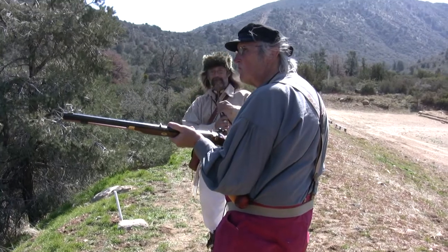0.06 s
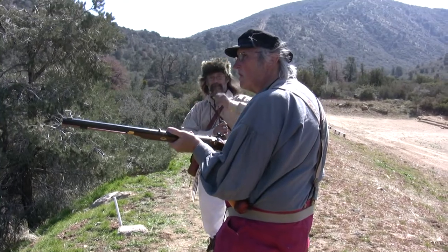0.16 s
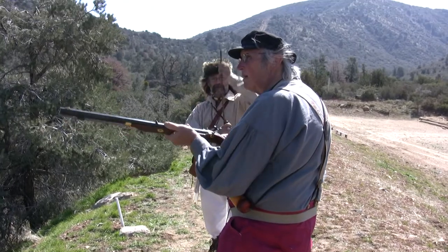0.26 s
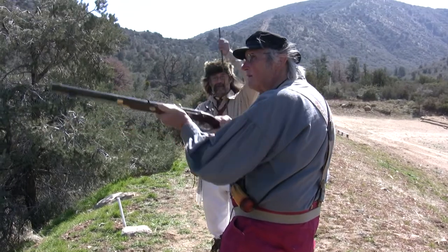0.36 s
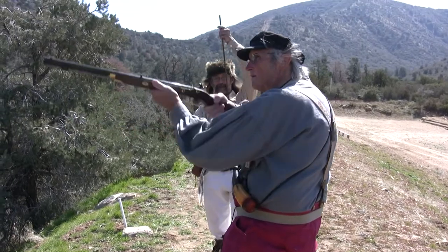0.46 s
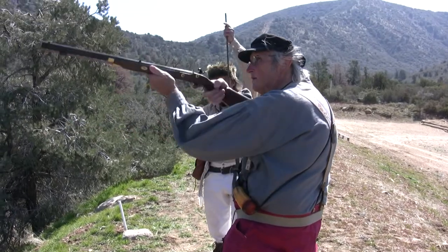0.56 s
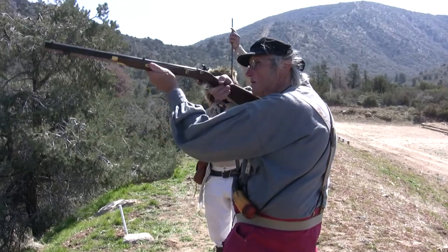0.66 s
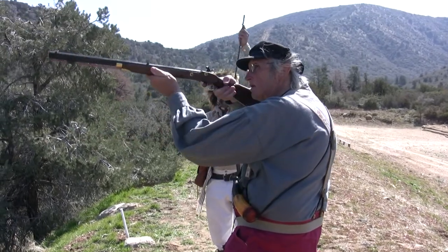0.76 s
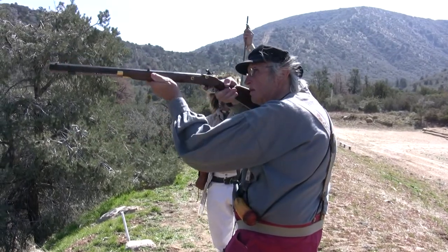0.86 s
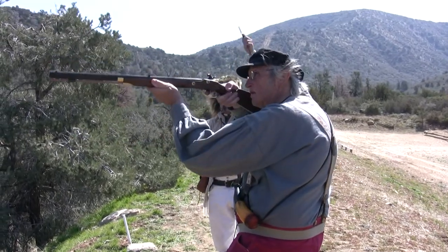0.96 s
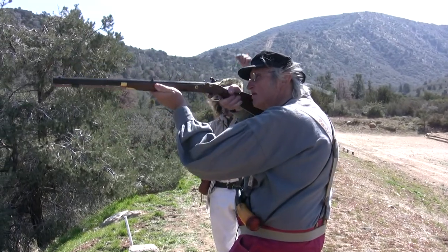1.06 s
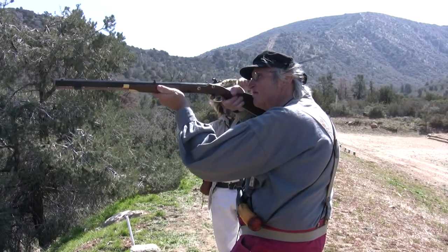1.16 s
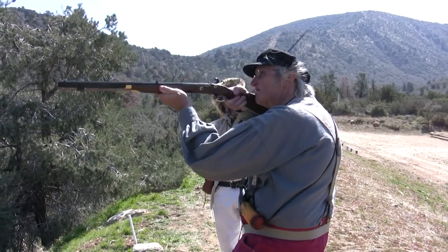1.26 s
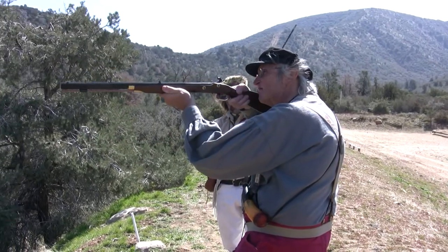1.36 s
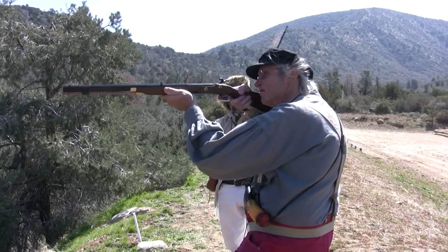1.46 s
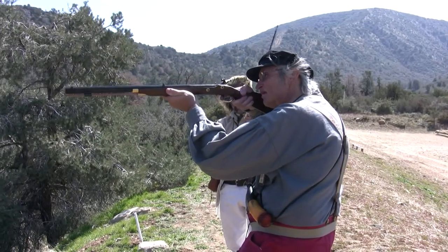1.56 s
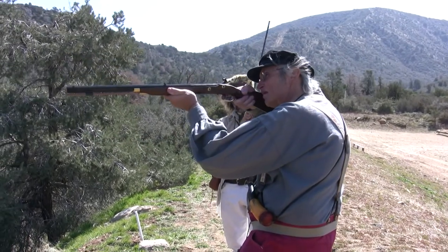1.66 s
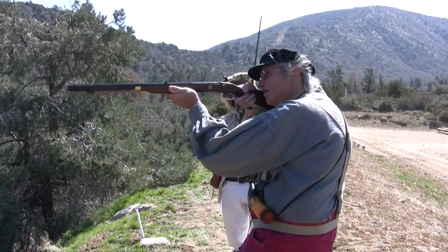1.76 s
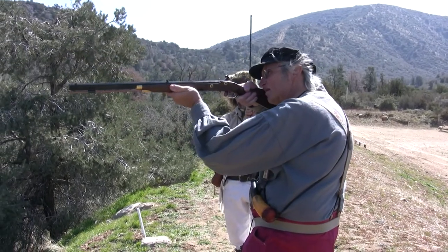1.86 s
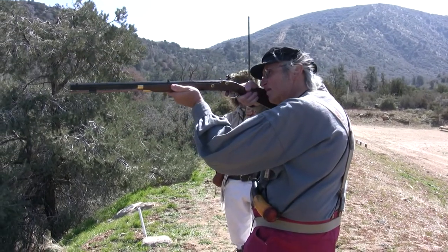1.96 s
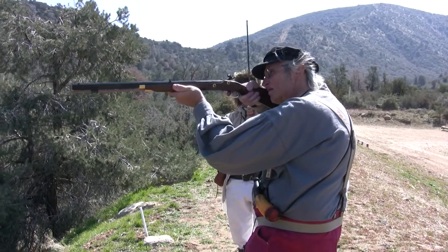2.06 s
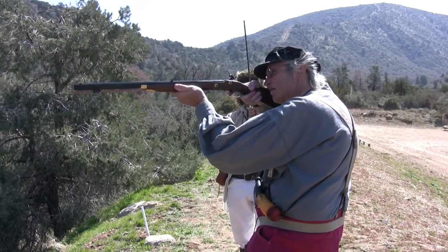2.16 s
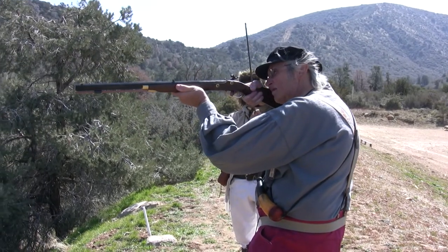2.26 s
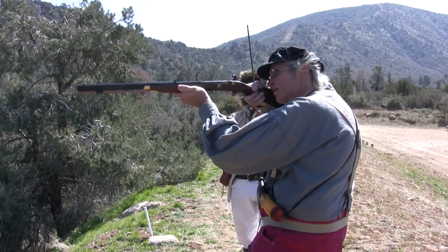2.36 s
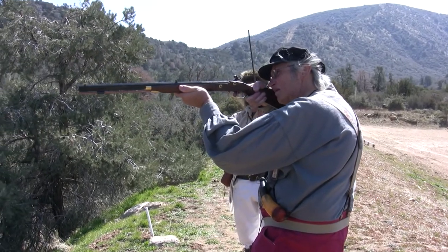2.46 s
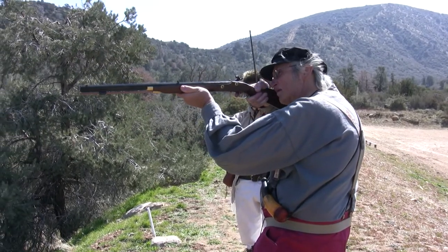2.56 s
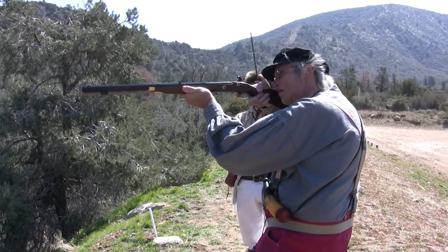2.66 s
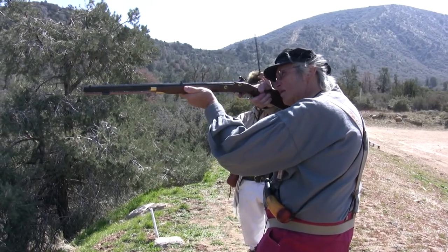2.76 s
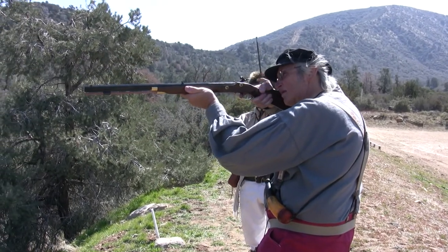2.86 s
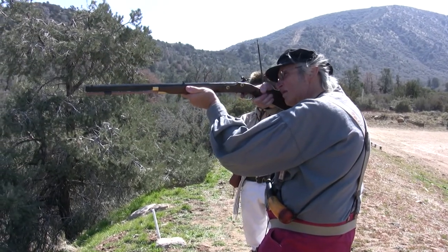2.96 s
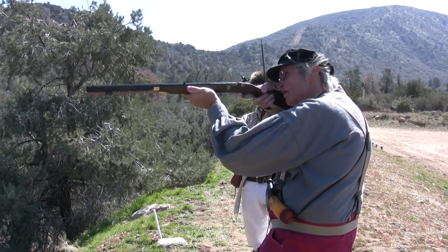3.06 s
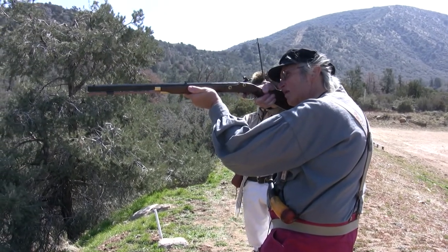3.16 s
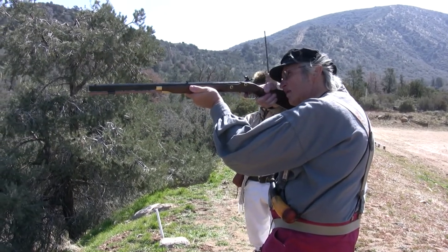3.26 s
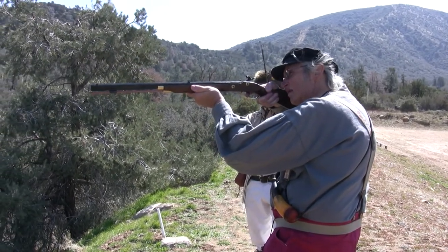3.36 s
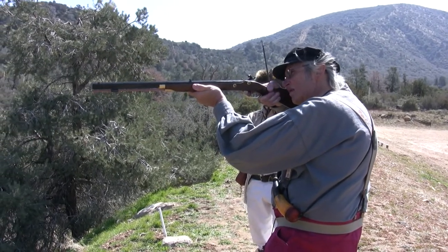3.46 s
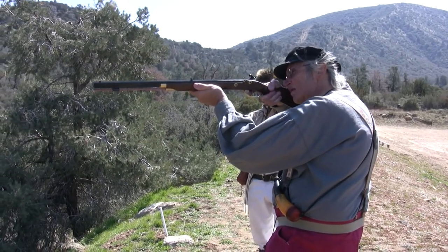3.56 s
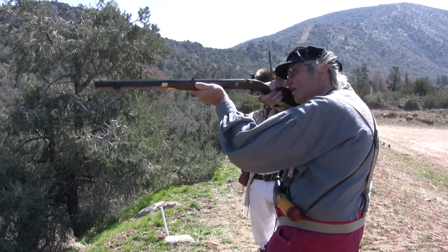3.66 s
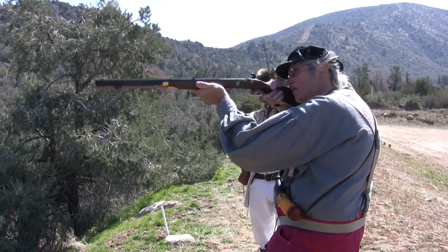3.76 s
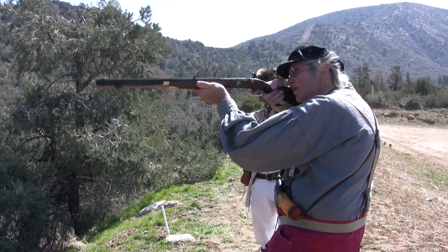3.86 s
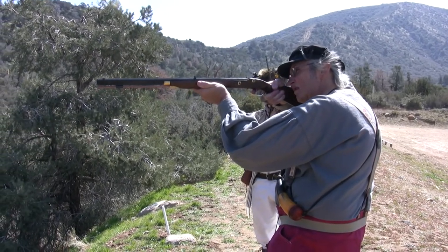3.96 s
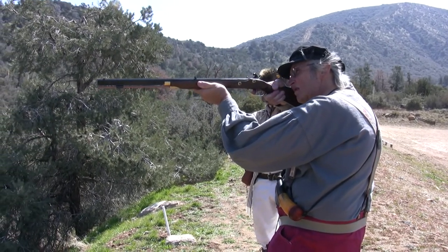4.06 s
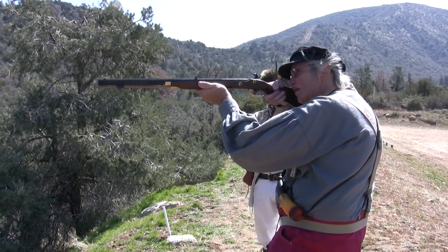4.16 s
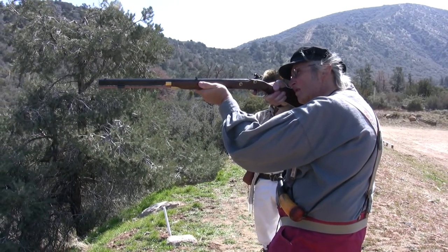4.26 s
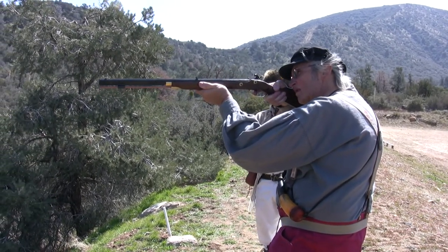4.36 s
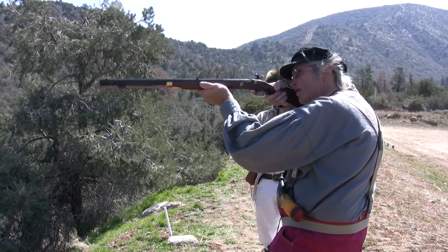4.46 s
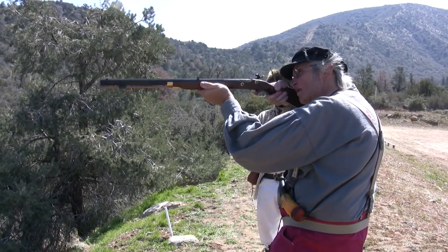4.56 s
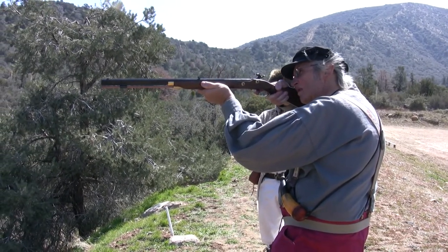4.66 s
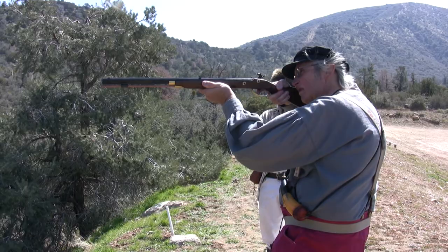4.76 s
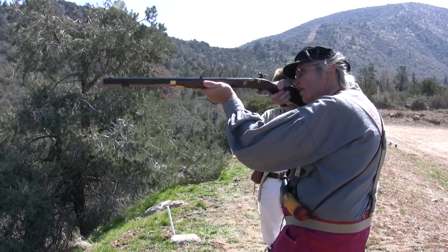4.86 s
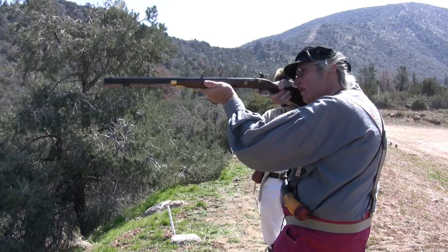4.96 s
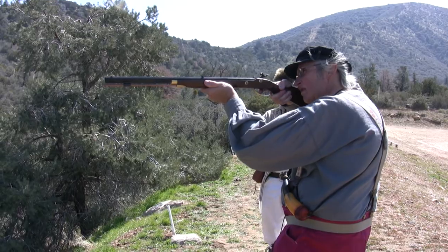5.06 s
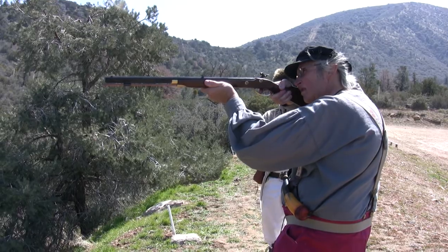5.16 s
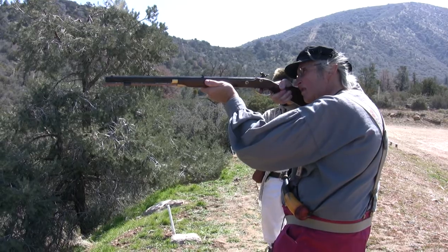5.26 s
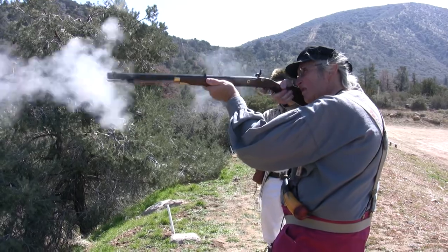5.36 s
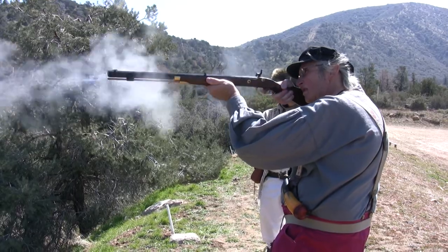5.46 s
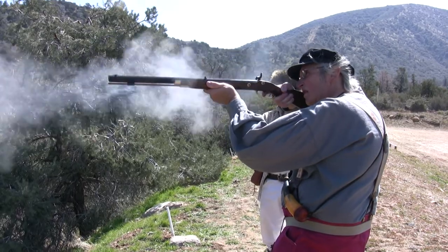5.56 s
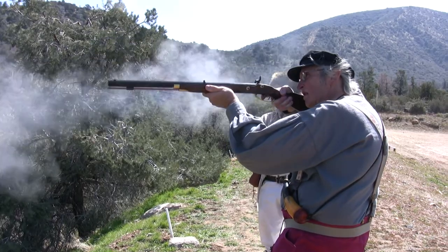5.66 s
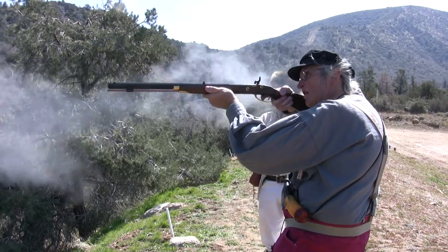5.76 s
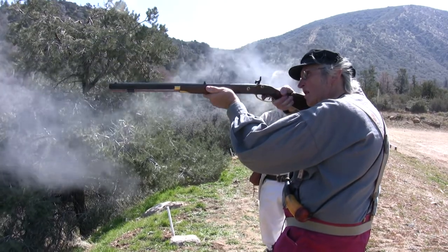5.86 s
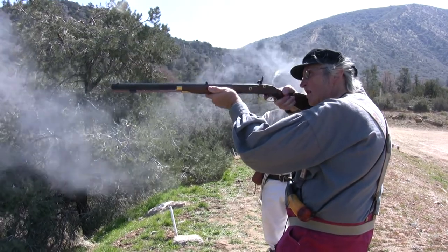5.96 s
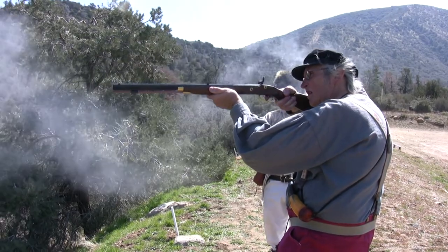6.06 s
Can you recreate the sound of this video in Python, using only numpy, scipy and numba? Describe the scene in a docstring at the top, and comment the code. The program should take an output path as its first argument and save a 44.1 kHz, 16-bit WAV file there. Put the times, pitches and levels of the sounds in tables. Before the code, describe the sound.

Outdoors, a ramrod scrapes and taps inside a rifle barrel under rumbling wind, then a muzzleloader cracks with overloaded force and echoes off hills.

```python
"""A camcorder stands on an open range below wooded hills: faint air hiss, its own motor, wind on the microphone.
From the start a neighbour runs a ramrod down his barrel with a whistle and a rising hiss, then tamps the load.
A few metres away a muzzleloading rifle is fired: gas jets hiss and two blast fronts overload the recorder.
Brush washes back at once, then a bank, wooded slopes and rock faces, mostly on the left, ever duller.
Two small ticks close by follow the shot."""
import sys
import numpy as np
from scipy import signal
from scipy.fft import rfft, irfft, next_fast_len
from scipy.io import wavfile
from scipy.ndimage import uniform_filter1d
from numba import njit

SR = 44100
rng = np.random.default_rng(int(sys.argv[2]) if len(sys.argv) > 2 else 0)


def digitize_waveform(pressure):
    """Quantize a signal to 16-bit integers and store it at the path in sys.argv[1].

    Rows of a 2-D input are taken as channels; values are limited to [-1, 1].
    """
    field = np.atleast_2d(pressure).T
    bounded = np.clip(field, -1, 1)
    quanta = np.round(bounded * 32767).astype(np.int16)
    wavfile.write(sys.argv[1], SR, quanta)


N = 269712
T = np.arange(N) / SR
SIZE = next_fast_len(N, real=True)
FREQS = np.arange(SIZE // 2 + 1) * SR / SIZE + 1e-3  # Hz, kept off zero for the divisions

# resonances of the neighbour's barrel with the rod in it: [f/Hz, width/Hz, level/dB]
BARREL = [(638.5, 37, 0.5), (1067, 205, 0), (1560, 166, -2.5), (1870, 56, 3), (2310, 55, 1),
          (2700, 57, -10), (3332, 92, -2), (3680, 100, -6), (4130, 91, -3), (4810, 50, -12),
          (5200, 82, -8.5), (6050, 82, -18), (6460, 100, -23)]
# tamping strokes, about four a second: [t/s of the blow, blow level/dB, thud level/dB,
# lead/s of the rod's lift before the blow, lift rub level/dB]
TAMPS = [(3.373, -33.5, -49, 0.06, -58), (3.636, -34, -35, 0.077, -45), (3.891, -33, -33, 0.048, -49),
         (4.132, -35, -32, 0.06, -49.5), (4.381, -33.5, -36.5, 0.069, -52.5), (4.619, -39, -48, 0.029, -53),
         (5.128, -38.5, -43, 0.068, -51)]
# blast fronts, each followed by its bounce off the ground: [t/s, peak level/dB, overpressure/ms,
# relaxation/ms, turbulence level/dB, turbulence fade/ms]
BLASTS = [(5.3526, 6, 0.75, 0.34, 16, 1.36), (5.357, 5.5, 0.56, .3, -4.5, 3.4),
          (5.3734, 16, 0.85, 1.23, 12, 1.84), (5.3786, 14.5, 2.04, 0.86, -3.5, 4.7)]
# lean of the hillside echoes towards the left: [f/Hz, left minus right level/dB]
HILL_PAN = [(100, -13), (200, 9), (400, 9), (1300, 11.5), (2400, 9.5), (4400, 8.5), (8000, 0.5),
            (15000, -3)]


def undb(db):
    """Decibels to gain."""
    return 10 ** (np.asarray(db) / 20)


def unit(x):
    """Scale to rms 1."""
    return x / np.sqrt(np.mean(x ** 2))


def along(points, hz=FREQS):
    """Read (Hz, value) points on a log-frequency axis."""
    f, value = np.transpose(points)
    return np.interp(np.log(hz), np.log(f), value)


def through(x, response):
    """Pass a sound through a frequency response."""
    return irfft(rfft(x, SIZE) * response, SIZE)[..., :N]


def filtered(x, gain):
    """Apply a gain per frequency, then scale to rms 1."""
    return unit(through(x, gain))


def resonances(modes):
    """Frequency response of (Hz, width Hz, dB) modes, with unit power gain."""
    response = sum(undb(db) / (1 + 1j * (FREQS ** 2 - hz ** 2) / (FREQS * width)) for hz, width, db in modes)
    return response / np.sqrt(np.mean(abs(response) ** 2))


@njit
def resonate(x, hz, width):
    """State-variable band-pass with a moving centre."""
    y, band, low = np.empty(len(x)), 0., 0.
    for i in range(len(x)):
        g = np.tan(np.pi * min(hz[i], .4 * SR) / SR)
        damping = width / hz[i]
        v = (band + g * (x[i] - low)) / (1 + g * (g + damping))
        band = 2 * v - band
        low = low + 2 * g * v
        y[i] = damping * v
    return y


def noise(likeness):
    """Left and right noise with a given correlation, fixed or per frequency."""
    c = np.clip(likeness, -1, 1)
    mid, side = rng.standard_normal((2, N))
    if np.ndim(c):
        mid, side = through(mid, np.sqrt(1 + c)), through(side, np.sqrt(1 - c))
    else:
        mid, side = mid * np.sqrt(1 + c), side * np.sqrt(1 - c)
    return unit(np.array([mid + side, mid - side]))


def pan(db):
    """Left and right gains for a level difference, left minus right."""
    return undb(np.array([[1], [-1]]) * db / 2)


def ports(x, lead_s=.000046):
    """Sound from the left reaches the right microphone port a moment after the left one."""
    return through(x, np.exp(-2j * np.pi * FREQS * np.array([[0], [lead_s]])))


def walk(rate):
    """Random levels held 1 / rate s and slewed twice, at rms near 1."""
    k = max(int(SR / rate), 1)
    steps = np.repeat(rng.standard_normal(N // k + 1), k)
    return unit(uniform_filter1d(uniform_filter1d(steps, k), k)[:N])


def burst(start, rise, fade):
    """Envelope that climbs to 1 around its start and dies away exponentially."""
    out = np.zeros(N)
    live = slice(*np.searchsorted(T, (start - rise, start + rise + 10 * fade)))
    age = T[live] - start
    out[live] = np.clip(age / rise + .5, 0, 1) * np.exp(-np.maximum(age - rise / 2, 0) / fade)
    return out


def swell(centre, half):
    """Envelope that grows to 1 and falls back smoothly, at one half after half s."""
    return 1 / (1 + ((T - centre) / half) ** 2)


def background(hiss_db=-58):
    """Faint open-air hiss and the camcorder's own motor, whose tones waver in level and pitch."""
    # colour of the open air: [f/Hz, level/dB]
    air_colour = [(59, -30), (100, -8), (156, -4), (197, -9.5), (871, -16), (1580, -21), (4860, -25),
                  (5290, -24), (6010, -25.5), (14000, -26.5), (16000, -30.5)]
    # tones of the motor whine: [f/Hz, rms level/dB]
    motor = [(150, -64), (4495, -82.5), (5093, -83.5), (5394, -76), (5696, -84), (7192, -86.5)]
    out = filtered(noise(0.1), undb(along(air_colour))) * undb(hiss_db)
    for hz, db in motor:
        level = np.sqrt(2) * undb(db + 0.85 * walk(6))
        turns = hz * np.cumsum(1 + 0.000503 * walk(7.3)) / SR
        out = out + level * np.sin(2 * np.pi * turns)
    return out


def wind(db=2.0, eddy_db=-33, eddy_growth=1.1, before_db=-50, after_db=-48, buffet_db=2.5, buffet_rate=25):
    """Eddies thump each port almost separately; strong gusts add finer, higher turbulence."""
    # one long gust on the microphone: [t/s, flow level/dB]
    long_gust = [(2.45, -47), (2.48, -52), (2.63, -27.5), (2.74, -33), (2.92, -23.5), (3.32, -39.5),
                 (3.5, -30), (3.61, -39.5), (4.01, -28), (4.1, -38.5), (4.13, -29.5), (4.32, -29),
                 (4.36, -22.5), (4.46, -35), (4.66, -29), (4.73, -45), (4.76, -32), (4.92, -46.5),
                 (4.97, -36), (5.1, -61)]
    # lone puffs: [t/s, flow level/dB, half length/s]
    puffs = [(0.452, -31.5, 0.022), (0.543, -33, 0.019), (.86, -41, 0.045), (1.343, -32.5, 0.038),
             (1.873, -32, 0.011), (2.027, -39.5, 0.016)]
    # colour of the rumble: [f/Hz, level/dB]
    rumble_colour = [(8.8, -46), (15, -0.5), (37, 2), (65, -2.5), (79, -6), (201, -30.5), (274, -33.5),
                     (373, -41), (500, -53), (650, -73), (1100, -120)]
    s, gust_db = np.transpose(long_gust)
    # a light breeze before and after the long gust
    flow = undb(np.interp(T, s, gust_db, left=before_db, right=after_db))
    puff_power = sum((undb(puff_db) * swell(at, half)) ** 2 for at, puff_db, half in puffs)
    gust = np.sqrt(flow ** 2 + puff_power)
    buffets = unit(undb(buffet_db * walk(buffet_rate)))
    rumble = filtered(noise(0.17), undb(along(rumble_colour)) / (1 + (FREQS / 420) ** 4))
    eddy_colour = [(60, 4), (170, 7.0), (350, -15), (800, -22), (3000, -47)]  # [f/Hz, level/dB]
    eddies = filtered(noise(0), undb(along(eddy_colour)))
    strength = gust / gust.max()
    low = undb(db) * gust * rumble
    high = undb(eddy_db) * gust.max() * strength ** eddy_growth * eddies
    return buffets * (low + high) * pan(-4.0)


def loader(pan_db=-2.0):
    """The neighbour's ramrod, just behind the shooter, run down, seated, then tamped; with it, short faint scrapes."""
    return ports(plunge() + ramrod() + seat() + thuds()) * pan(pan_db)


def plunge(width_hz=1100.0, third_db=-5, rough_db=3.0, ring_db=-51):
    """Friction hiss sounds the air under the rod, rising as the column shortens; a barrel mode near 640 Hz hums
    on."""
    # the rod slides in at the muzzle: [t/s, level/dB]
    slide_levels = [(0, -52), (.06, -53.5), (.14, -59), (.25, -59), (.32, -72)]
    # its thin whistle: [f/Hz, width/Hz, level/dB]
    whistle = [(814, 350, -6.5), (1640, 290, 0), (1970, 140, -16), (3460, 130, -9)]
    # the rod is run down the bore: [t/s, quarter-wave pitch f/Hz of the trapped air, level/dB]
    run_down = [(.28, 604, -52), (.34, 800, -63), (.36, 1090, -57.5), (0.383, 1490, -48),
                (0.402, 2390, -47), (.42, 4400, -48), (.435, 5300, -45), (.47, 5370, -74)]
    s, pitch, db = np.transpose(run_down)
    hz = np.exp(np.interp(T, s, np.log(pitch)))
    hiss = rng.standard_normal(N) * undb(rough_db * walk(249))

    def sounded(centre, width):
        """Two band-passes in a row on the friction hiss."""
        return resonate(resonate(hiss, centre, width), centre, width)

    # a column closed at one end sounds its third harmonic too
    column = sounded(hz, width_hz) + undb(third_db) * sounded(3 * hz, 2 * width_hz)
    column = filtered(column, 1 / (1 + (FREQS / 7500) ** 4))
    column = column * undb(np.interp(T, s, db, left=-120, right=-120))
    slide_db = np.interp(T, *np.transpose(slide_levels), right=-120)
    slide = filtered(hiss, resonances(whistle)) * undb(slide_db)
    hum = np.sin(2 * np.pi * BARREL[0][0] * T) * undb(ring_db) * burst(0.367, 0.18, 0.025)
    return column + slide + hum


def ramrod(grit_db=4.0, ring_db=-6, rub_db=-5.0, catch_db=2.5, rattle_spread_db=5.0,
           squeak_db=-3.0, squeak_width_hz=750.0, wander=0.38):
    """The rod rubs along the bore, rattles loosely and chatters as it lands on the load; all of it rings the barrel."""
    # the rod knocks against the barrel: [t/s, level/dB, fade/s]
    knock_list = [(.043, -58, .005), (.182, -50, 0.0045), (0.202, -44, 0.024), (0.2819, -30.5, .007),
                  (0.307, -44, 0.013), (0.579, -42, 0.0093), (.622, -51, .006), (.824, -47.5, 0.0033),
                  (1.615, -44.5, 0.0031), (1.859, -53, 0.0094), (2.304, -51.5, 0.02), (2.47, -52, 0.012),
                  (2.622, -50.5, 0.013), (2.729, -42.5, 0.0047), (2.778, -48, 0.0033), (5.251, -42, 0.0079)]
    # colour of a contact: [f/Hz, level/dB]
    contact_colour = [(150, -28), (350, 0), (550, -16), (1000, -3.5), (1800, -6.5), (3400, -2), (5300, -4),
                      (8800, -11), (15000, -20)]
    # the loose rod rattles in the bore: [t/s, level/dB]
    rattle_levels = [(3.15, -85), (3.55, -63.5), (4.25, -64), (4.55, -54.5), (4.76, -64.5), (5.3, -62)]
    knock_hardness, tamp_hardness = 0.79, 0.11  # 0 padded and dull, 1 hard and bright
    chatter = noise(0.91) * undb(grit_db * walk(1500))
    octaves = np.log2(np.clip(FREQS, 300, 9000) / 2000)
    colour_db = along(contact_colour)
    dull = filtered(chatter, undb(colour_db - 2 * octaves))
    bright = filtered(chatter, undb(colour_db + 4 * octaves))
    knocks = sum(undb(db) * burst(s, 0.0033, fade) for s, db, fade in knock_list)
    tamps = sum(undb(db) * burst(s, 0.0036, 0.0049) for s, db, *_ in TAMPS)
    contact = knocks * (dull + knock_hardness * (bright - dull))
    contact = contact + tamps * (dull + tamp_hardness * (bright - dull))
    # each slide catches and slips, and the pitch of its hiss wanders
    slides = strokes()
    catches = unit(undb(catch_db * walk(230)))
    squeak = 0
    for level, hz in slides:
        moving_hz = hz * np.exp(wander * walk(25))
        squeak = squeak + level * unit(resonate(chatter[0], moving_hz, squeak_width_hz))
    rubbing = catches * sum(level for level, _ in slides)
    rattle_db = np.interp(T, *np.transpose(rattle_levels), left=-120, right=-120)
    rattle = unit(undb(rattle_spread_db * walk(70))) * undb(rattle_db)
    drive = undb(rub_db) * rubbing + rattle + undb(ring_db) * (knocks + tamps)
    ringing = through(unit(chatter) * drive, resonances(BARREL))
    return contact + undb(squeak_db) * catches * squeak + ringing


def strokes():
    """Slides as (envelope, mean pitch of the hiss Hz): rod lifted, run down, rebounding; and short faint scrapes."""
    # short faint scrapes, the last one just before the shot, probably the rifle's lock:
    # [t/s, level/dB, half length/s]
    scrape_list = [(.268, -43.5, 0.012), (2.719, -55, .013), (2.834, -55.5, 0.024), (2.989, -58.5, 0.0093),
                   (4.836, -60, .014), (5.325, -50, 0.01)]
    # drawn up before each stroke
    lift = sum(undb(db) * swell(s - lead, 0.0089) for s, _, _, lead, db in TAMPS)
    # run down the bore 0.01 s before each blow, 15 dB below it
    run = sum(undb(db - 15) * swell(s - 0.01, 0.0084) for s, db, *_ in TAMPS)
    # sprung back off the load 0.044 s after the blow
    rebound = sum(undb(-62.5) * swell(s + 0.044, 0.021) for s, *_ in TAMPS)
    scrape = sum(undb(db) * swell(s, half) for s, db, half in scrape_list)
    return [(lift, 3120), (run, 2340), (rebound, 1700), (scrape, 2620)]


def seat(start=.431, db=-39, rise=0.0065, fade=0.016, dull_hz=1100):
    """At the end of its run down the bore the rod grinds to a stop and rings the barrel's low modes."""
    grind = noise(0.94) * undb(4.0 * walk(620))
    ringing = filtered(grind, resonances(BARREL) / (1 + (FREQS / dull_hz) ** 2))
    return ringing * undb(db) * burst(start, rise, fade)


def thuds(first_hz=406, sag_hz_per_s=77, fade=.006):
    """Each blow on the load gives a low, quickly damped knock, lower from stroke to stroke."""
    out = 0
    for s, _, db, *_ in TAMPS:
        hz = first_hz - sag_hz_per_s * (s - TAMPS[0][0])
        out = out + undb(db) * burst(s, 0.0014, fade) * np.sin(2 * np.pi * hz * (T - s))
    return out


def shot(likeness=0.79, suction_db=-12, suction_fade=0.0089):
    """Gas jets hiss; each blast is a sudden overpressure, a longer suction and a wake of turbulence."""
    # jets of burning gas ahead of each blast: [t/s, level/dB, fade/s]
    jets = [(5.3454, -14, 0.0096), (5.3712, -15.5, 0.0041)]
    # colours of the jets and of the turbulence: [f/Hz, level/dB]
    jet_colour = [(100, -16), (800, -3.5), (2300, 9.5), (5000, 0.5), (9000, 3.5), (15000, -4)]
    blast_colour = [(60, 5.5), (300, -4.5), (520, -12), (1000, 4.5), (1400, -6), (2100, -2), (2700, -8),
                    (4200, -5), (6500, -8.5), (8800, -6), (15000, -22)]
    jet_level = sum(undb(db) * burst(s, 0.0011, fade) for s, db, fade in jets)
    out = filtered(noise(0.56), undb(along(jet_colour))) * jet_level
    wake = filtered(noise(likeness), undb(along(blast_colour)))
    for s, peak_db, push_ms, relax_ms, wake_db, wake_ms in BLASTS:
        ms = np.clip((T - s) * 1000, 0, 100)
        front = (1 - ms / push_ms) * np.exp(-ms / relax_ms)
        turbulence = undb(wake_db) * wake * np.exp(-ms / wake_ms)
        # the microphone turns overpressure into negative swing
        out = out + (T >= s) * (turbulence - undb(peak_db) * front)
    # the air flows back slowly after the first front
    return out + undb(suction_db) * burst(BLASTS[0][0] + 0.0016, 0.0022, suction_fade)


def brush(db=-20.5, fade=0.1, patchy_db=2.5):
    """Ground and bushes close by scatter a bright wash from all sides."""
    # colour of the wash: [f/Hz, level/dB]
    brush_colour = [(35, -71), (60, -41), (130, -19), (274, -7), (407, -20), (447, -8.5), (578, -15),
                    (620, -11.5), (2290, -4), (2770, -7), (13900, -23.5), (16000, -36)]
    likeness = along([(3500, 0.53), (12000, -0.23)])  # [f/Hz, left-right correlation]
    # leans half as far to the left as the hills
    wash = filtered(noise(likeness), undb(along(brush_colour)) * pan(.5 * along(HILL_PAN)))
    return wash * undb(db + patchy_db * walk(200)) * burst(5.394, 0.0056, fade)


def hills(nearest_db=-16, db_per_doubling=-3.5, air_db=11.5, air_power=0.74, swell_db=8.0, swell_hz=330,
          patchy_db=1.37, clump_db=1.5):
    """Slopes return dense scatter; the longer the path, the less treble is left and the more the low boom counts."""
    # wooded slopes that scatter the shot back: [t/s, fade/s]
    slopes = [(5.5065, 0.036), (5.554, 0.047), (5.593, 0.022), (5.632, 0.04), (5.677, 0.018), (5.712, 0.15),
              (5.778, 0.25), (5.883, 0.17)]
    # colour of the scatter before the path dulls it: [f/Hz, level/dB]
    hill_colour = [(35, -59), (60, -35), (85, -36.5), (217, -16), (362, -9), (748, -8.5), (1190, -2.5),
                   (1410, 0), (2290, -8), (3330, -11), (4020, -12), (5980, -18.5), (6720, -15.5),
                   (11800, -34), (16000, -36)]
    # how alike the two ports hear it: [f/Hz, left-right correlation]
    hill_likeness = [(100, 0.65), (600, 0.27), (1400, 0.55), (6800, 0.44), (15000, 0)]
    # far echoes come from fewer, larger features, so they arrive in clumps
    far = np.interp(T, (5.55, 5.8), (.3, 1))
    scatter = noise(along(hill_likeness)) * undb(patchy_db * walk(900) + clump_db * far * walk(160))
    scatter = filtered(scatter, undb(along(hill_colour)) * pan(along(HILL_PAN)))
    fired, nearest = BLASTS[0][0], slopes[0][0]
    power = 0
    for s, fade in slopes:
        doublings = np.log2((s - fired) / (nearest - fired))  # of the path length
        power = power + (undb(nearest_db + db_per_doubling * doublings) * burst(s, 0.0076, fade)) ** 2
    hz, s, spectra = signal.stft(scatter * np.sqrt(power), SR, nperseg=256)
    delay = np.maximum(s - nearest, 0)
    # per second of delay: a gain around the boom, a loss that grows with frequency
    boom = swell_db * np.exp(-((hz - swell_hz) / 450) ** 2)
    db_per_s = boom - air_db * (hz / 1000) ** air_power
    return signal.istft(spectra * undb(np.outer(db_per_s, delay)), SR)[1][:, :N]


def bank(start=5.51, db=-22, fade=0.047, pan_db=11.0):
    """The nearest bank slaps back the whole blast from the left, thump and crack still in it."""
    colour = [(50, -3), (150, 4.5), (400, -4), (1200, -31), (2200, 13.5), (3600, -9), (5200, 4.5),
              (6400, -23), (8000, -7.0), (10000, -13), (15000, -29)]  # [f/Hz, level/dB]
    slap = filtered(noise(0.87), undb(along(colour)))
    return slap * undb(db) * burst(start, 0.006, fade) * pan(pan_db)


def rocks(hz=950, width=0.00044):
    """Bare faces mirror the blast as a short, rounded pulse, 14 dB weaker on the right."""
    # rock faces that return one clean pulse: [t/s, peak level/dB on the left]
    faces = [(5.684, -9.5), (5.774, -2), (5.800, -10), (5.8955, -10), (5.921, -15), (5.956, -16)]
    arrivals = np.zeros(N)
    for s, db in faces:
        arrivals[min(int(s * SR), N - 1)] = undb(db)
    t = np.arange(-256, 257) / SR
    pulse = -np.cos(2 * np.pi * hz * t) * np.exp(-abs(t) / width)
    return signal.oaconvolve(arrivals, pulse, "same") * undb(np.array([[0], [-14]]))


def ticks():
    """Short, thin ticks close by: bright noise that dies in milliseconds."""
    # small bright ticks after the shot: [t/s, level/dB]
    tick_list = [(5.819, -36.5), (5.984, -53)]
    colour = [(2000, -25), (5000, -14), (9000, -4), (15000, -8)]  # [f/Hz, level/dB]
    level = sum(undb(db) * burst(s, .002, .004) for s, db in tick_list)
    return filtered(noise(0), undb(along(colour))) * level


def scene():
    """Open air, wind and loading, then the shot, its echoes and the ticks."""
    before = background() + wind() + loader()
    echoes = brush() + hills() + bank() + rocks()
    return before + ports(shot(), lead_s=.000034) + echoes + ticks()


def record(dry, top_hz=16100):
    """The input overloads on the blast and clips flat; a steep low-pass then cuts the top."""
    clipped = np.clip(dry, -.96, .96)
    low_pass = signal.ellip(8, .2, 80, top_hz, fs=SR, output="sos")
    return signal.sosfilt(low_pass, clipped)


dry = scene()
out = record(dry)
digitize_waveform(out)
```